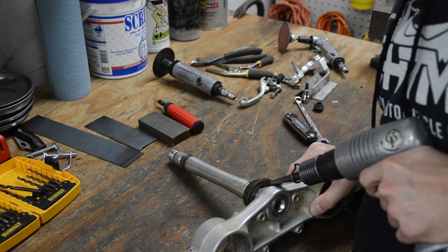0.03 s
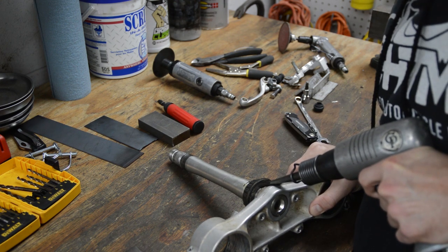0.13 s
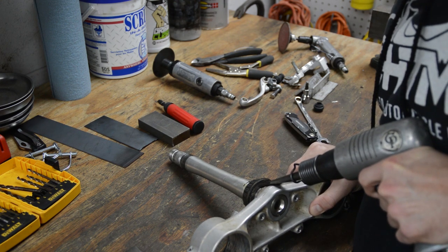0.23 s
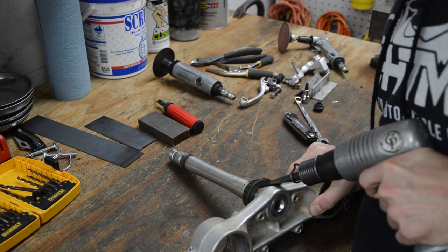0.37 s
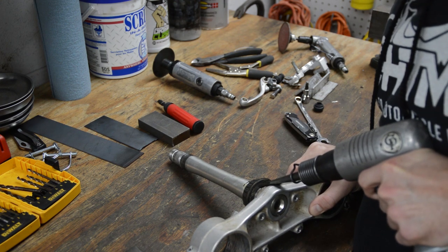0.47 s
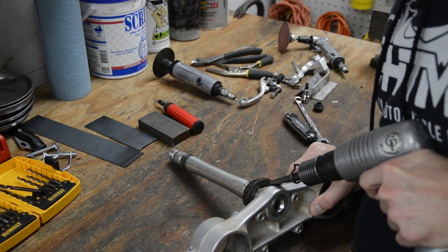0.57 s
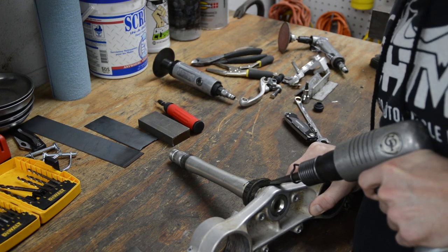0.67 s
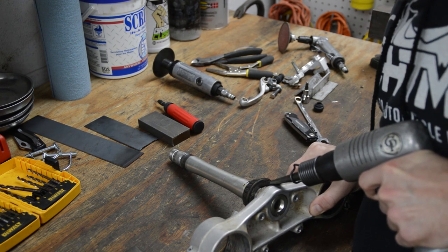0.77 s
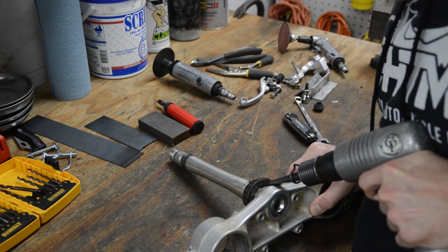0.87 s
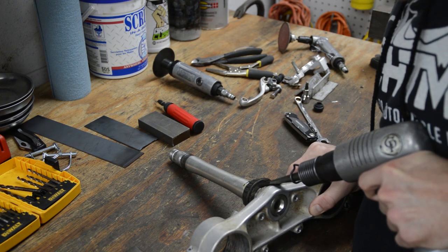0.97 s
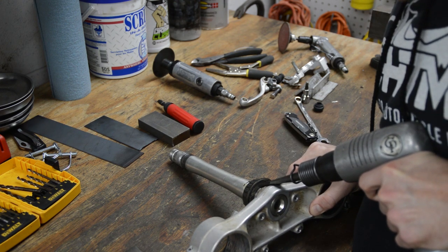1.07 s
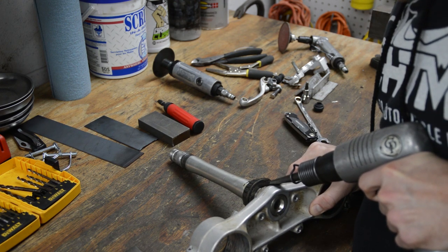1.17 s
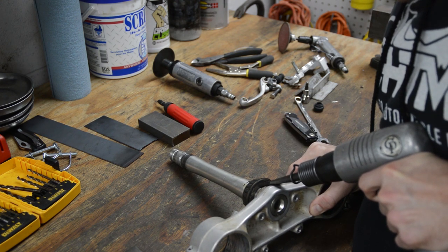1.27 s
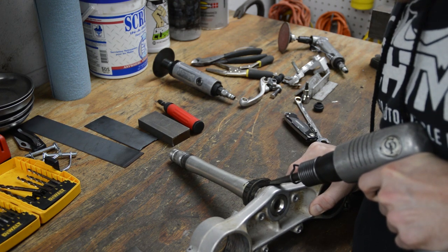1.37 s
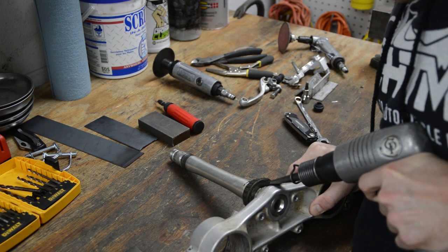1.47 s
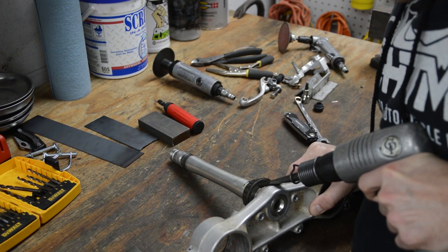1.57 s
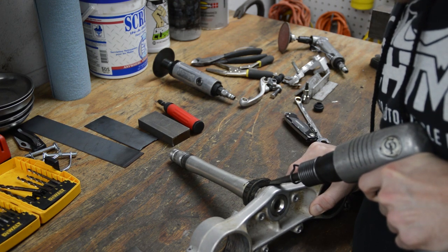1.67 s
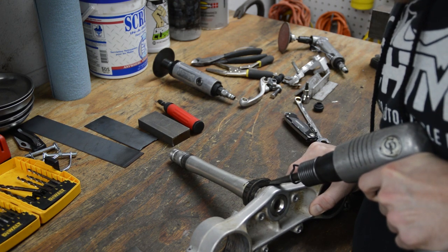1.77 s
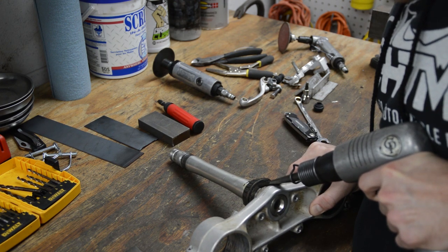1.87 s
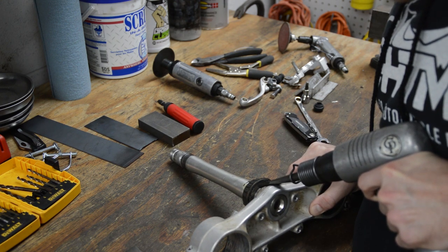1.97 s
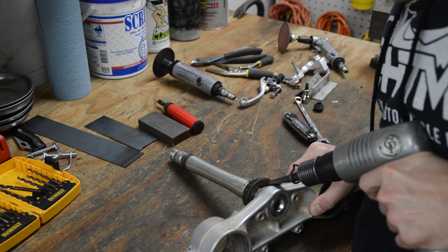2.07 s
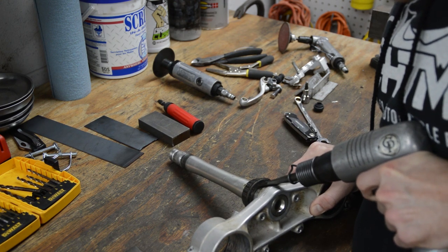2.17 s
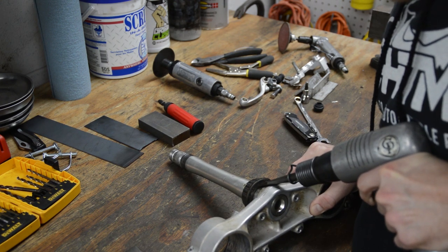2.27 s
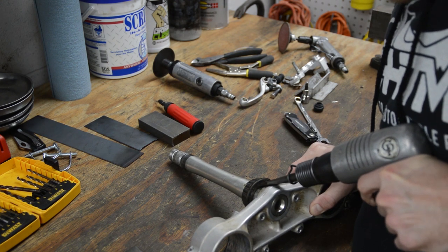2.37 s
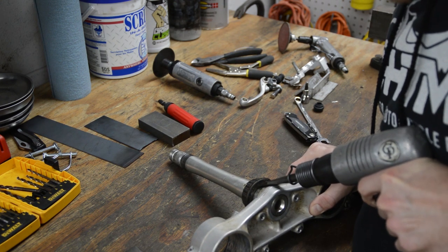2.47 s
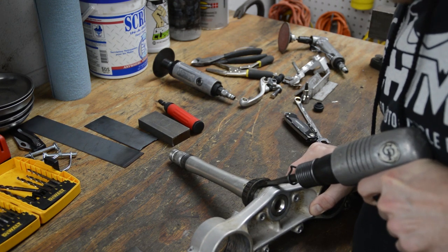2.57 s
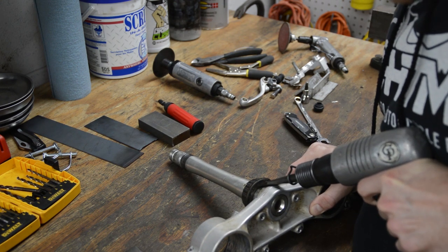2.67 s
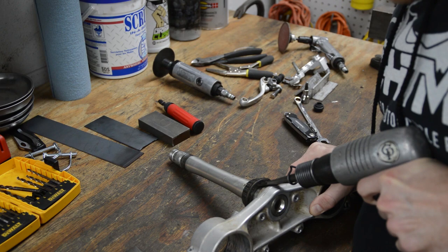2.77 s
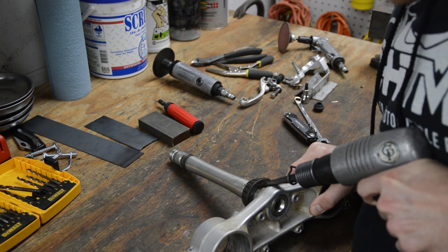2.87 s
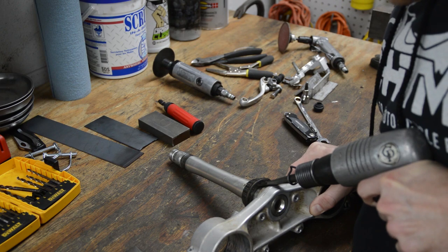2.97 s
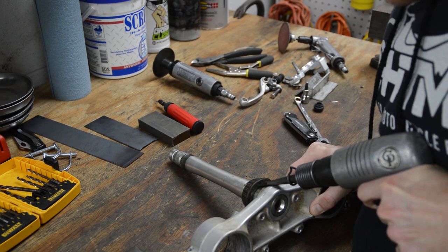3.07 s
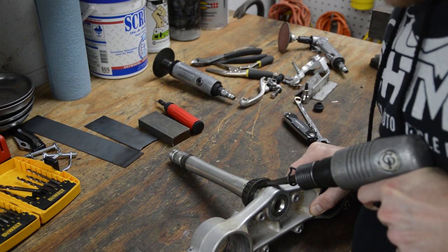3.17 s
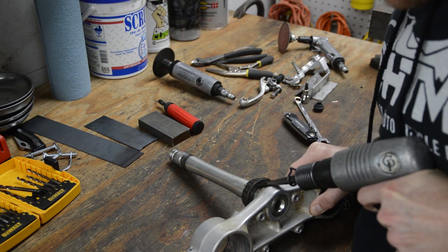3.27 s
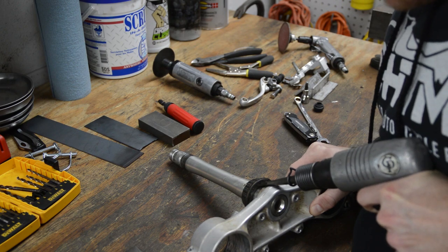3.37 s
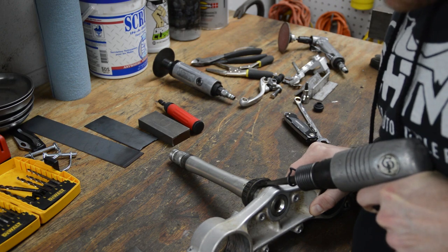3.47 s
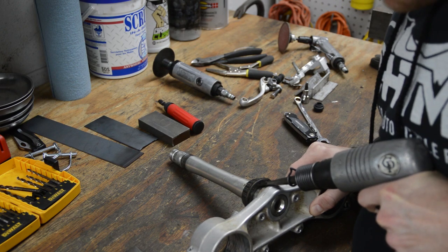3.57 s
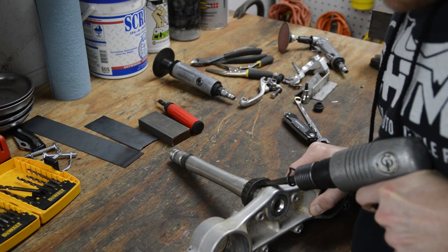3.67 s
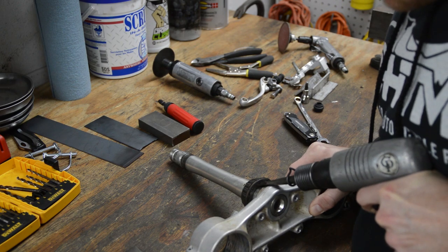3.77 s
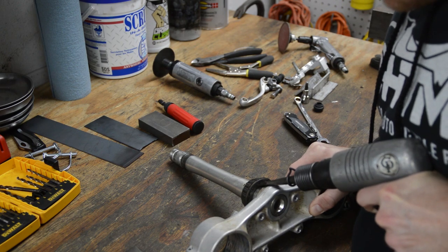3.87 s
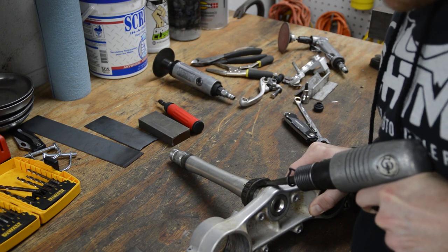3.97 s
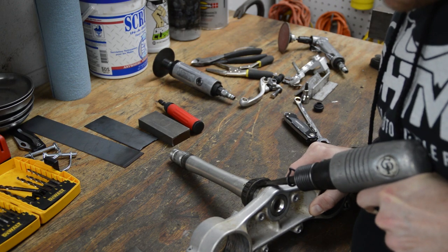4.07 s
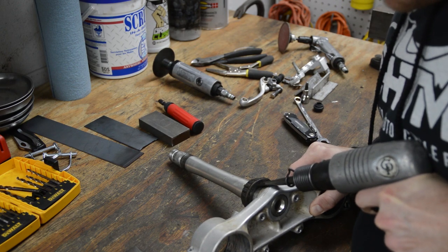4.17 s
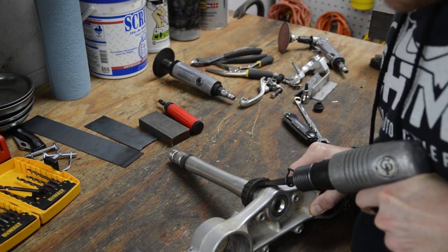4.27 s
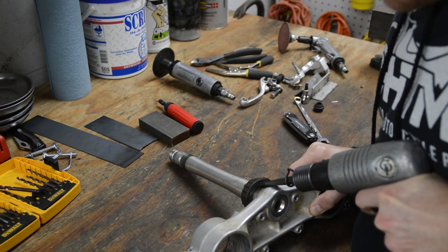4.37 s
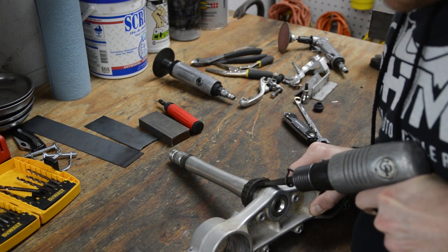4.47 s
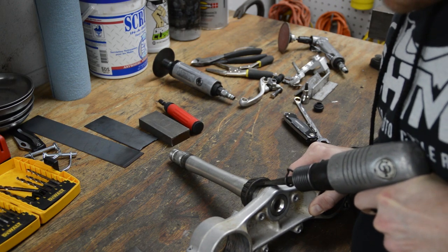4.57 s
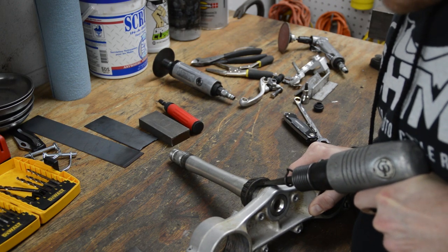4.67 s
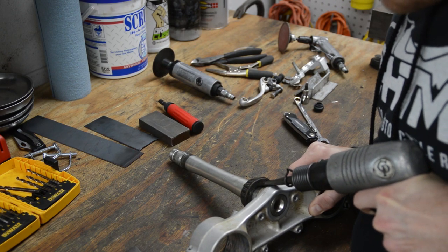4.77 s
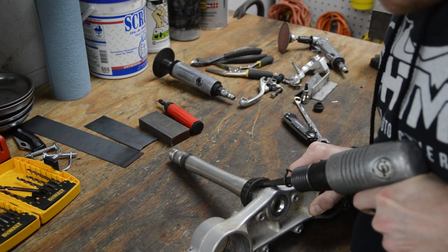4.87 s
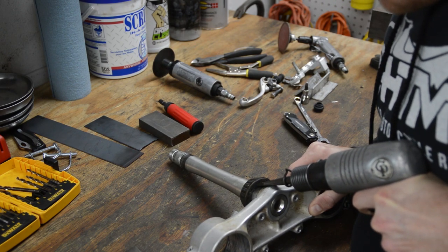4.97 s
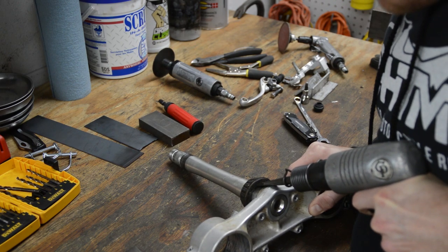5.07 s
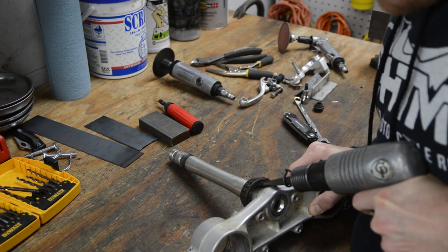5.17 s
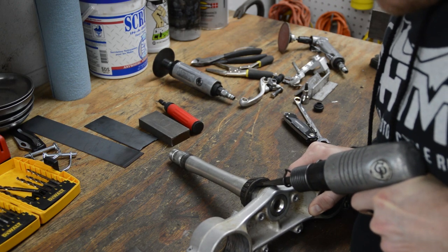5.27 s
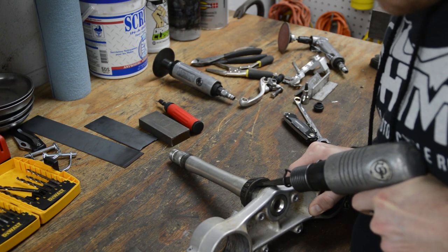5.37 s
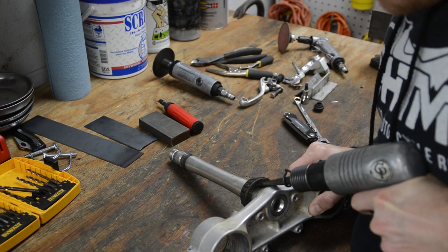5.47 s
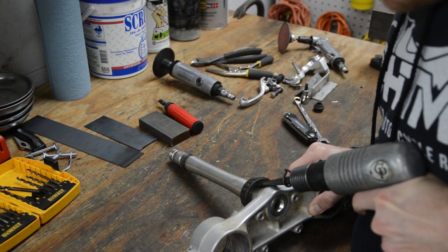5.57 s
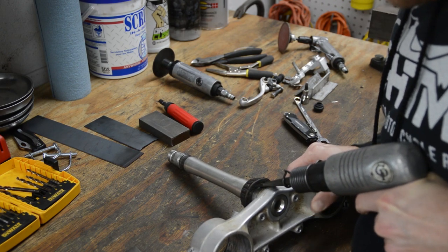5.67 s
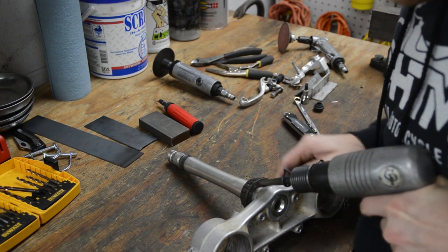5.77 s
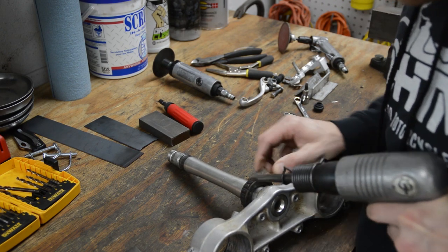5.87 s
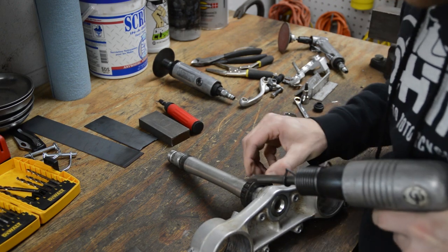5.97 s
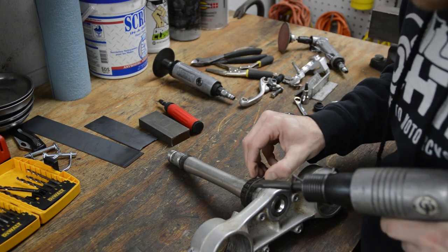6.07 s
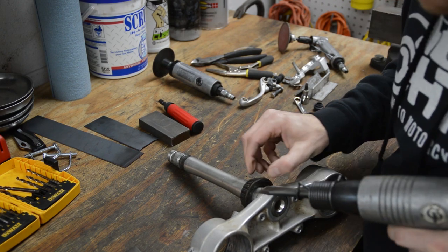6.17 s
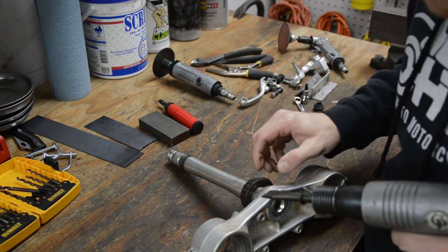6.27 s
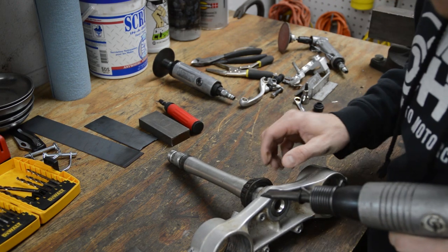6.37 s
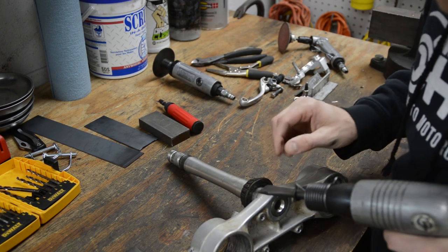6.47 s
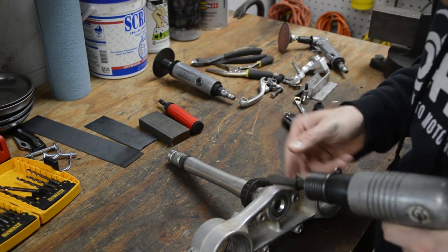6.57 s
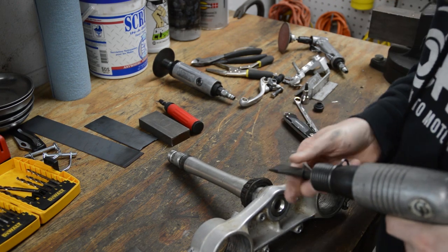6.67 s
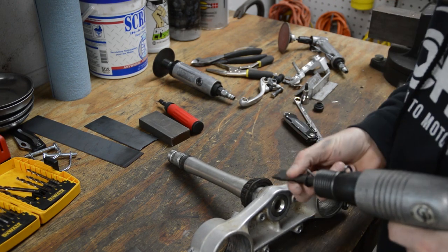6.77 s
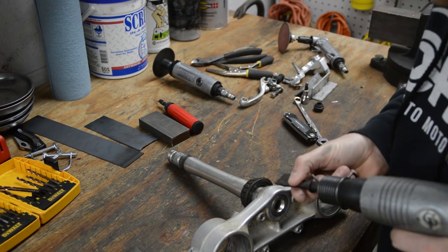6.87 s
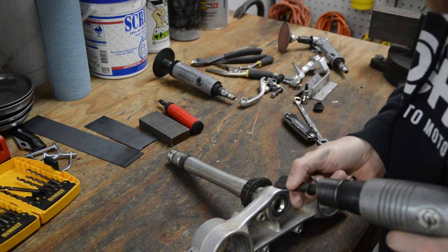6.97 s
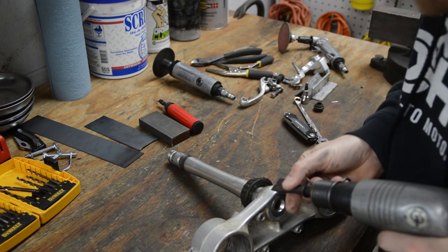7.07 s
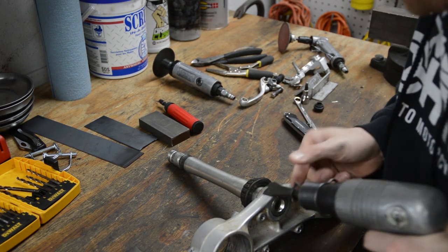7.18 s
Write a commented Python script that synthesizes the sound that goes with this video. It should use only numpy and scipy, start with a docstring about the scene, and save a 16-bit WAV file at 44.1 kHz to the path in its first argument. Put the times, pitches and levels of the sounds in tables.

```python
"""An air hammer drives a chisel against a steel bearing on a part held on a wooden bench in a small workshop.
Each piston stroke vents a hissing puff with a low pop, sets the air in the barrel hooting and shakes the
bench; strong strokes land on the chisel milliseconds later and the steel cracks and rings. Short bursts
surround one long, even run; at the end the loose bit jingles and the tip slides over the part.
The close microphone overloads on the loud bursts."""
import sys
import numpy as np
from scipy import signal
from scipy.fft import rfft, irfft
from scipy.io import wavfile

SR = 44100
rng = np.random.default_rng(int(sys.argv[2]) if len(sys.argv) > 2 else 0)


def write(x):
    x = np.atleast_2d(x).T
    wavfile.write(sys.argv[1], SR, np.round(np.clip(x, -1, 1) * 32767).astype(np.int16))


N = 319284

FORE, BACK = 625, 930   # starting pitch_hz of the barrel air as the piston flies forward or back
# single piston strokes: start_s, hiss_db, pop_db, barrel_hz
STROKES = [(0.0004, -17, -16.5, FORE), (0.025, -29.5, -38, BACK), (0.1384, -15.5, -16, FORE),
           (0.156, -13, -20, FORE), (0.173, -3.5, -0.5, FORE), (0.207, -13, -4.5, BACK),
           (0.4145, -19.5, -14, FORE), (0.4373, -23.5, -38.5, BACK), (0.4565, -15, -6.5, FORE),
           (0.4992, -35, -10.5, FORE), (0.618, -16, -20.5, FORE), (0.6369, -13, -11, FORE),
           (0.6525, -13, -0.5, FORE), (0.6871, -6.5, -2.5, BACK), (0.8758, -20, -16, FORE),
           (0.8979, -22, -38, BACK), (0.9179, -14, -6, FORE), (0.9588, -11.5, -4.5, BACK),
           (1.076, -19, -16.5, FORE), (1.0986, -23.5, -35, BACK), (1.1184, -15, -10, FORE),
           (1.1587, -15.5, -2, FORE), (2.149, -13, -11, FORE), (2.1627, -9.5, -13, FORE),
           (2.1768, -2.5, 2.7, BACK), (2.197, -4, 1, FORE), (2.2183, -6.5, 6, FORE),
           (2.2374, -15.5, -6.5, FORE), (2.2566, -15.5, 2.2, BACK), (3.6555, -9.5, -2.5, FORE),
           (3.683, -11, -0.6, FORE), (3.695, -11.5, 4, BACK), (3.7076, -16, -11, FORE),
           (3.7237, -7.5, -2.3, BACK), (3.9761, -15.5, -15.5, FORE), (3.9929, -17.5, -29, BACK),
           (4.0119, -5, -2, FORE), (4.0565, -17.5, -9, FORE), (4.1645, -14, -23.5, FORE),
           (4.1775, -9.5, -12, FORE), (4.192, 2, 4.5, FORE), (4.2078, -23.5, -1.5, BACK),
           (4.2263, -6.7, 2.5, FORE), (4.249, -5.5, -2.5, BACK), (4.571, -11, -12.5, FORE),
           (4.5868, -12.5, -9.5, FORE), (4.6019, -0.5, 2.8, FORE), (4.6267, -18.5, -1.5, FORE),
           (4.6436, -9, -17.5, BACK), (4.665, -10, -3.5, FORE), (4.8916, -10.5, -5, FORE),
           (4.9176, -3, 3, FORE), (4.9416, -3.5, -2, FORE), (4.9564, -7.5, 4.3, BACK),
           (4.973, -2, -4, FORE), (5.2627, -11.5, -13.5, FORE), (5.2781, -22, -19.5, FORE),
           (5.3, -3.5, -4, FORE), (5.3188, -15, -6, BACK), (5.4639, -12, -13.5, FORE),
           (5.4809, -14.5, -14, FORE), (5.4999, -29, 0, FORE), (5.5239, -14.5, -27, BACK),
           (5.5403, -9.5, -7.5, FORE)]
# trigger pulls, each opening the valve for a burst: start_s, puff_db, thud_db, chisel_db, barrel_hz
BURSTS = [(0.122, -25, -16.5, -24.5, 870), (0.3967, -26.5, -35, -28.5, 1540),
          (0.602, -25, -15.5, -19.5, 940), (0.8602, -26.5, -31.5, -38.5, 1450),
          (1.056, -29.5, -25, -21, 910), (2.1375, -26, -22, -21.5, 1510), (3.6402, -19, -18, -17, 930),
          (3.9584, -24, -18, -20.5, 900), (4.1518, -24, -14, -24.5, 810),
          (4.5542, -24.5, -17.5, -24.5, 925), (4.8787, -22.5, -21, -6.5, 890),
          (5.245, -26, -18, -25.5, 905), (5.4501, -23.5, -16.5, -12, 1570)]
# pace of the long run, trigger held and tool leaned on hard: stroke_number, start_s
LONG_RUN = [(0, 1.1962), (3, 1.313), (7, 1.4731), (14, 1.7555), (17, 1.8769), (20, 1.9954), (21, 2.0375)]
RETURN_LAG_S = .021   # in the run the piston flies back this long after each stroke
# spectra of the lingering exhaust hiss and of its sharp first puff: frequency_hz, density_db
HISS_SPECTRUM = [(500, -51), (1200, -18.5), (2200, -6.5), (4000, -16), (7000, -8.5), (10000, -1.5),
                 (13500, -4), (16000, -4.5)]
PUFF_SPECTRUM = [(500, -40), (1200, -17.5), (2200, -6.5), (4000, -8.5), (5600, -2), (7000, -9.5),
                 (10000, -2), (16000, -7)]
# low modes of the bench: pitch_hz, level_db, t60_s
THUD_MODES = [(85, -29.5, .1), (111, -15.5, 0.36), (151.7, 5, 0.12), (186, 3, 0.15), (228, 1.5, 0.14)]
# spectra of the shuddering bench top and of the loose tools on it: frequency_hz, density_db
BENCH_TOP_SPECTRUM = [(70, -32), (140, -4.5), (230, -6.5), (380, 2.5), (600, -3.5), (950, 0), (1400, -11.5),
                      (1800, -21), (3000, -27)]
LOOSE_TOOL_SPECTRUM = [(70, -31.5), (140, -2), (300, -3.5), (600, -2.5), (1000, -1.5), (1450, -5),
                       (1800, -22), (3000, -30.5)]
# overtones of the air in the barrel: pitch_ratio, level_db, fall_s
BARREL_OVERTONES = [(3.051, -19, 0.0045), (4.85, -10.5, .005)]
# resonances of the exhaust port: pitch_hz, level_db, t60_s
PORT_MODES = [(262, 0, .022), (480, -10, .02)]
# hollow knocks of the tool (trigger, handling, setting it down): start_s, knock_db, hiss_db
TOOL_KNOCKS = [(0.025, -25, -68), (0.588, -30, -47.5), (2.532, -38, -64), (3.615, -34, -55),
               (3.937, -31.5, -55), (4.533, -59.5, -58), (4.86, -50.5, -52)]
# modes of the grip: pitch_hz, level_db, t60_s
GRIP_MODES = [(583.3, 2.5, 0.042), (917, -11.5, 0.017), (1570, -11, .03), (2370, -17.5, .04),
              (2840, -25, .04), (5850, -30.5, .04), (11700, -23, .04)]
# single blows of piston on chisel: start_s, crack_db, part_db
BLOWS = [(0.173, -7, -18.5), (0.2121, -11, -8.5), (0.4635, -13.5, -11.5), (0.5045, -13, -10.5),
         (0.6551, -7.5, -8), (0.6893, -8.5, -11.5), (0.9243, -11, -11.5), (0.9624, -9.5, -9.5),
         (1.1252, -18, -16), (1.1628, -7.5, -12.5), (2.1797, -5.5, -33), (2.1991, -0.4, -20),
         (2.2197, -3.5, -23.5), (2.2399, 1.24, -29), (2.2605, -13.5, -9), (2.2977, -28, -39.5),
         (3.6608, -9, -11), (3.6852, -5, -25), (3.708, -3, -18), (3.761, -23, -23.5),
         (4.0149, -12.5, -10.5), (4.0617, -16, -16), (4.194, -10, -31), (4.211, 1, -8), (4.2395, -9.5, -4),
         (4.6019, -6.5, -21.5), (4.6287, -2.5, -22.5), (4.6708, -16.5, -12.5), (4.8998, -14.5, -15),
         (4.9238, -5, -7), (4.9429, -19, -29.5), (4.9736, -17, -7.5), (5.0007, -26, -29),
         (5.2707, -18, -18), (5.3048, -18.5, -20), (5.355, -24, -24), (5.4992, -5, -8), (5.5424, -21, -10)]
# spectrum of rattling steel: frequency_hz, density_db
CRACK_SPECTRUM = [(600, -42), (1200, 5.5), (2200, -1), (3500, -2.5), (5500, 0), (8000, 2), (12000, -1),
                  (16000, -0.5)]
# modes of the bodies that a blow excites: pitch_hz, level_db, t60_s
PART_MODES = [(3150, -12, .03), (3480, -12, .04), (3870, -12, .03), (4890, -13, .03), (4985, -8.5, .045),
              (5270, -9, .025), (6065, -10, .045), (6550, -15, .03), (6870, -12, .05), (7170, -10, .045),
              (7400, -6, .03), (7740, -7, .015), (8150, -1, .03), (8270, 0, .045), (8400, -9, .07),
              (8660, -12, .04), (9470, -15, .03), (9980, -15, .03)]
CHISEL_MODES = [(11520, -1, .08), (11910, -8, .05), (12450, -10, .04), (15050, -6, .09)]
SHEET_METAL_MODES = [(382, 0, 1.0), (571, -4, 1.6), (694, -8, .9), (770, -8, .9), (856, -8, 1.0),
                     (947, -8, .9), (1206, -10, 1.4), (1287, -8, 1.0)]
BENCH_MODES = [(200, -15.5, 0.078), (221, -8, 0.15), (255.2, -1, 0.14), (270, 0.5, 0.31), (691, -14.5, .08),
               (1085, 1, .07), (1277, -4.5, 0.099)]
# the tool touches the part; the bit jingles in its spring as the tool is lifted: start_s, tick_db, ring_db
TOUCHES = [(2.5315, -32, -49), (5.8383, -63, -79), (5.891, -56.5, -80), (7.039, -80, -93)]
JINGLES = [(6.1535, -68, -65), (6.34, -90, -82), (6.385, -90, -80), (6.5218, -65, -80)]
# spectrum of a light contact: frequency_hz, density_db
TICK_SPECTRUM = [(500, -15), (1500, 21), (4000, 15), (8500, 13), (10000, -33), (16000, -25)]
# modes of the loose bit: pitch_hz, level_db, t60_s
LOOSE_BIT_MODES = [(4700, -10, .05), (5240, -3, .12), (7000, -4, .04), (7340, -7, .05), (8300, -6, .03),
                   (8700, -1, .04)]
# loudness of the sliding chisel tip: time_s, level_db
SLIDE_LEVELS = [(7.0, -96), (7.1, -76), (7.206, -57), (7.24, -63)]
# spectrum of its friction: frequency_hz, density_db
SLIDE_SPECTRUM = [(120, -42.5), (200, -13), (263, -1), (479, -9), (575, -6), (1150, -13), (2060, -7),
                  (15500, -30)]
# reverberation time of the workshop: frequency_hz, t60_s
ROOM_T60 = [(60, 0.2), (150, 0.11), (500, 0.2), (2000, 0.3), (7000, 0.27), (10000, 0.2), (16000, 0.13)]
# strength of its echoes: frequency_hz, level_db
ROOM_SPECTRUM = [(60, -2.5), (250, -6), (1000, -13), (4000, -8), (10000, -9), (16000, -21)]
# its background rumble: frequency_hz, density_db
RUMBLE_SPECTRUM = [(7.1, -32.5), (12, 6.5), (25, -16), (52, -19), (186, -36), (223, -39), (301, -41),
                   (394, -42.5), (1130, -53.5), (1240, -48.5), (1530, -57.5), (11500, -71), (16000, -80.5)]


def from_db(db):
    """Decibels to amplitude ratio."""
    return 10 ** (np.asarray(db) / 20)


def at_hz(points, hz):
    """Interpolation on a log-frequency axis."""
    point_hz, values = np.transpose(points)
    return np.interp(np.log(hz), np.log(point_hz), values)


def butterworth(x, kind, hz, order=2):
    """A filter with a maximally flat passband."""
    return signal.sosfilt(signal.butter(order, hz, kind, fs=SR, output="sos"), x)


def noise(spectrum, size=N):
    """Spectral shaping of white noise, scaled to unit rms."""
    hz = np.maximum(np.arange(size // 2 + 1) * SR / size, 1)
    x = irfft(rfft(rng.standard_normal(size)) * from_db(at_hz(spectrum, hz)), size)
    return x / np.std(x)


def impulses(times, db):
    """Ideal impacts, each one sample long."""
    train = np.full(N, 1e-18)
    train[(np.asarray(times) * SR).astype(int)] = from_db(db)
    return train


def envelope(times, db, rise_s, fall_s):
    """Exponential growth and decay after each impulse."""
    up, down = np.exp(-1 / (rise_s * SR)), np.exp(-1 / (fall_s * SR))
    decay = signal.lfilter([1], [1, -down], impulses(times, db))
    return signal.lfilter([1 - up], [1, -up], decay)


def struck(modes, times, db, spread_db):
    """Modal superposition: every hit excites each damped mode with a slightly random strength."""
    out, chance = np.zeros(N), rng.standard_normal((len(times), len(modes)))
    for k, (hz, mode_db, t60) in enumerate(modes):
        radius, angle = from_db(-60 / (t60 * SR)), 2 * np.pi * hz / SR
        train = impulses(times, db + mode_db + spread_db * chance[:, k])
        out += signal.lfilter([0, np.sin(angle)], [1, -2 * radius * np.cos(angle), radius ** 2], train)
    return out


def run_times():
    """Nearly periodic stroke times while the trigger is held."""
    number, start_s = np.transpose(LONG_RUN)
    return np.interp(np.arange(number[-1] + 1), number, start_s)


def with_run(singles, run_values, lag_s=0):
    """Columns of the single events, followed by the nearly identical events of the long run."""
    times = run_times() + lag_s
    values = run_values + .5 * rng.standard_normal((len(times), len(run_values)))
    return np.vstack([singles, np.column_stack([times, values])]).T


def by_burst(times, in_burst, in_run):
    """A setting held through each burst (one for all, or one each); the long run has its own."""
    starts = np.transpose(BURSTS)[0]
    burst = np.maximum(np.searchsorted(starts, times, "right") - 1, 0)
    running = (times >= LONG_RUN[0][1]) & (times < LONG_RUN[-1][1] + RETURN_LAG_S)
    return np.where(running, in_run, np.broadcast_to(in_burst, len(starts))[burst])


def exhaust_hiss(times, db):
    """Turbulent jet noise: a sharp puff, and a lingering hiss that grows faster with stroke strength."""
    hiss = envelope(times, 1.2 * db, rise_s=.0027, fall_s=.0074) * noise(HISS_SPECTRUM)
    puff_db, pulls = db + 1.5, len(BURSTS)   # the valve openings are listed first and swell more slowly
    valve = envelope(times[:pulls], puff_db[:pulls], rise_s=.003, fall_s=.005)
    strokes = envelope(times[pulls:], puff_db[pulls:], rise_s=.0012, fall_s=.0035)
    return hiss + (valve + strokes) * noise(PUFF_SPECTRUM)


def bench_thud(times, pop_db):
    """Each jolt excites the low modes of the bench, less so when the tool is leaned on."""
    thud_db = by_burst(times, np.transpose(BURSTS)[2], in_run=-38.5) + .56 * pop_db
    return struck(THUD_MODES, times, thud_db, spread_db=3)


def bench_rattle(times, pop_db):
    """The bench top has one impulse response; loose tools rattle incoherently, so their powers add."""
    jolts = impulses(times, pop_db + by_burst(times, in_burst=-9.5, in_run=-13))
    t, rise_s, t60_s, tools_db = np.arange(SR // 2) / SR, .005, .2, -6
    shape = (1 - np.exp(-t / rise_s)) ** 2 * from_db(-60 * t / t60_s)
    top = signal.fftconvolve(jolts, shape * noise(BENCH_TOP_SPECTRUM, size=len(t)))[:N]
    tool_power = np.abs(signal.fftconvolve(jolts ** 2, shape ** 2)[:N])
    return top + from_db(tools_db) * np.sqrt(tool_power) * noise(LOOSE_TOOL_SPECTRUM)


def barrel_hoots(times, barrel_hz, pop_db):
    """A pipe closed at one end has near-odd overtones; the pitch climbs as the piston shortens it."""
    scatter = 1 + by_burst(times, in_burst=.04, in_run=0) * rng.standard_normal(len(times))
    hoot_db = by_burst(times, in_burst=-4.5, in_run=.5) + .55 * pop_db
    hoots = list(zip(times, barrel_hz * scatter, hoot_db))
    hoots += [(start_s + RETURN_LAG_S, BACK, -9) for start_s in run_times()]
    out, t = np.zeros(N + SR), np.arange(SR // 20) / SR
    rise, glide = (1 - np.exp(-t / .0047)) ** 2, t + 4 * t ** 2
    for start_s, start_hz, level_db in hoots:
        phase = 2 * np.pi * start_hz * glide
        tone = np.exp(-t / .006) * np.sin(phase)
        for ratio, overtone_db, fall_s in BARREL_OVERTONES:
            tone += from_db(overtone_db) * np.exp(-t / fall_s) * np.sin(ratio * phase)
        at = int(start_s * SR)
        out[at:at + len(t)] += from_db(level_db) * rise * tone
    return out[:N]


def port_pops(times, pop_db):
    """A pulse of air rings the port, which is too small to radiate low frequencies well."""
    return butterworth(struck(PORT_MODES, times, pop_db, spread_db=2.15), "high", hz=182)


def air_strokes():
    """Each valve opening and piston stroke releases compressed air and jolts the bench."""
    openings = [(start_s, puff_db, puff_db - 11, hz) for start_s, puff_db, _, _, hz in BURSTS]
    events = np.vstack([openings, STROKES])
    times, hiss_db, pop_db, barrel_hz = with_run(events, run_values=(-16.5, -4.5, 601.3))
    hiss = exhaust_hiss(times, hiss_db)
    bench = bench_thud(times, pop_db) + bench_rattle(times, pop_db)
    return hiss + bench + barrel_hoots(times, barrel_hz, pop_db) + port_pops(times, pop_db)


def tool_knocks():
    """A jolt to the tool excites the damped modes of its grip: a hollow knock with a little hiss."""
    times, knock_db, hiss_db = np.transpose(TOOL_KNOCKS)
    hiss = envelope(times, hiss_db, rise_s=.001, fall_s=.031) * noise(CRACK_SPECTRUM)
    return hiss + struck(GRIP_MODES, times, knock_db, spread_db=3)


def chisel_blows():
    """A brief impact is broadband: steel cracks; part, chisel, bench and nearby sheet metal ring freely."""
    times, crack_db, part_db = with_run(BLOWS, run_values=(-11.5, -12), lag_s=.0065)
    # leaning on the tool damps the chisel
    chisel_db = .4 * crack_db + by_burst(times, np.transpose(BURSTS)[3], in_run=-36.5)
    knock_db = .22 * crack_db + by_burst(times, in_burst=-21.5, in_run=-21)
    crack = envelope(times, crack_db, rise_s=.00011, fall_s=.0099) * noise(CRACK_SPECTRUM)
    part = struck(PART_MODES, times, part_db, spread_db=1.5)
    chisel = struck(CHISEL_MODES, times, chisel_db, spread_db=3)
    sheet_metal = struck(SHEET_METAL_MODES, times, knock_db - 30, spread_db=1.5)
    bench = struck(BENCH_MODES, times, knock_db, spread_db=2.5)
    return crack + part + chisel + sheet_metal + bench


def light_contacts(contacts, modes):
    """A light impact gives a short tick, then faint free vibration of the steel."""
    times, tick_db, ring_db = np.transpose(contacts)
    tick = envelope(times, tick_db, rise_s=.0005, fall_s=.0015) * noise(TICK_SPECTRUM)
    return tick + struck(modes, times, ring_db, spread_db=3)


def hand_scuff(start_s=6.272, pitch_hz=1490, t60_s=.02):
    """Friction of the hand on the part: six irregular impulses excite one heavily damped mode."""
    times = start_s + np.cumsum(rng.uniform(0, .008, size=6))
    return struck([(pitch_hz, 0, t60_s)], times, db=-70, spread_db=4)


def tip_slide(grain_samples=90, spread_db=3):
    """Sliding friction of the chisel tip on the part: noise whose level jumps from grain to grain."""
    times, db = np.transpose(SLIDE_LEVELS)
    grains = np.repeat(rng.standard_normal(N // grain_samples + 1), grain_samples)[:N]
    level_db = np.interp(np.arange(N) / SR, times, db, left=-140)
    return from_db(level_db + spread_db * grains) * noise(SLIDE_SPECTRUM)


def reverberation(direct, far_db=-63.5, far_t60_s=.98):
    """A diffuse field decays exponentially in each band; the building's far end adds a faint dull tail."""
    t, white, echoes = np.arange(SR) / SR, rng.standard_normal((3, SR)), np.zeros(SR)
    for k, low_hz in enumerate(40 * 2 ** np.arange(0, 9, .5)):
        high_hz = min(low_hz * np.sqrt(2), 20000)
        centre_hz = np.sqrt(low_hz * high_hz)
        band = butterworth(white[k % 2], "band", [low_hz, high_hz])
        t60 = at_hz(ROOM_T60, centre_hz)
        decay_energy = t60 * SR / np.log(1e6)
        echoes += band * from_db(at_hz(ROOM_SPECTRUM, centre_hz) - 60 * t / t60) / np.sqrt(decay_energy)
    echoes += butterworth(white[2], "low", hz=920) * from_db(far_db - 60 * t / far_t60_s)
    echoes *= np.clip((t - .002) / .0018, 0, 1)   # travel time of the first reflections
    return signal.fftconvolve(direct, echoes)[:N]


def scene():
    """Superposition of the direct sound, its reverberation and the rumble of the quiet workshop."""
    direct = air_strokes() + chisel_blows()
    direct += light_contacts(TOUCHES, PART_MODES) + light_contacts(JINGLES, LOOSE_BIT_MODES)
    direct += hand_scuff() + tool_knocks() + tip_slide()
    # small sources radiate no deep bass
    sound = butterworth(direct + reverberation(direct), "high", hz=56)
    return (sound + from_db(-50.5) * noise(RUMBLE_SPECTRUM))[None]


def record(dry):
    """Saturation in the overloaded microphone flattens peaks; filters remove offset and extreme treble."""
    ceiling, hardness, cutoff_hz = .37, 4, 16100
    saturated = dry / (1 + np.abs(dry / ceiling) ** hardness) ** (1 / hardness)
    centred = butterworth(saturated, "high", hz=3, order=1)
    return signal.sosfiltfilt(signal.cheby2(12, 22, cutoff_hz, fs=SR, output="sos"), centred)


dry = scene()
out = record(dry)
write(out)
```